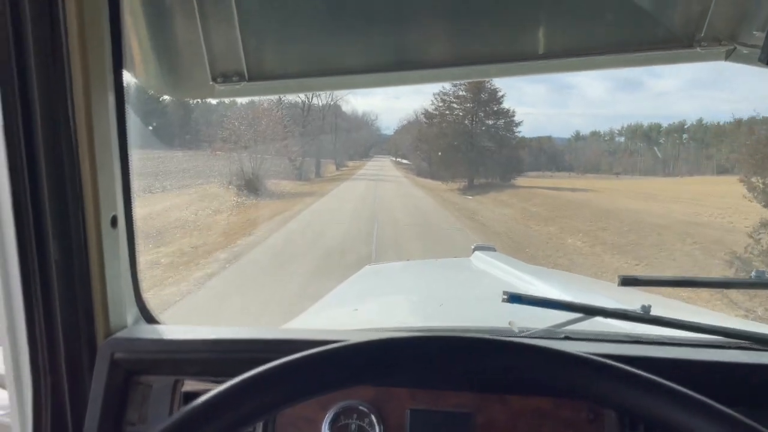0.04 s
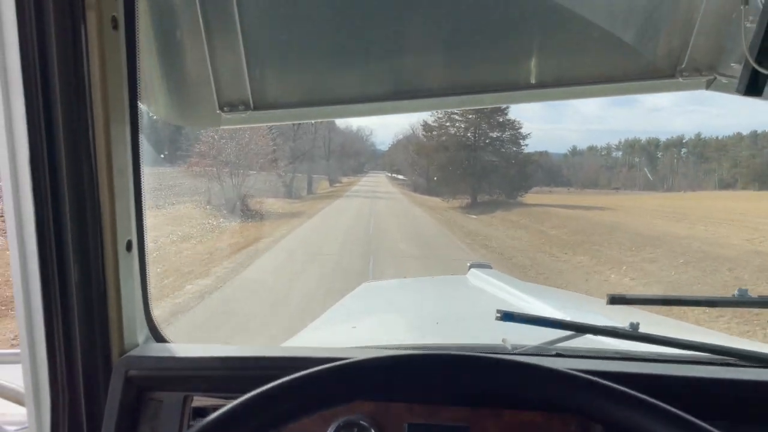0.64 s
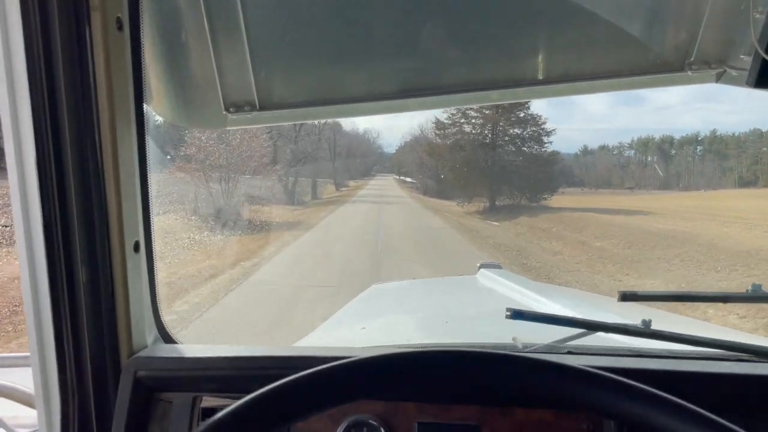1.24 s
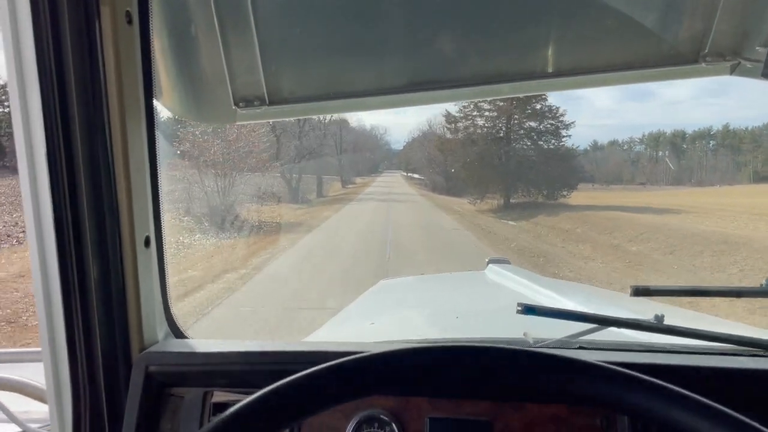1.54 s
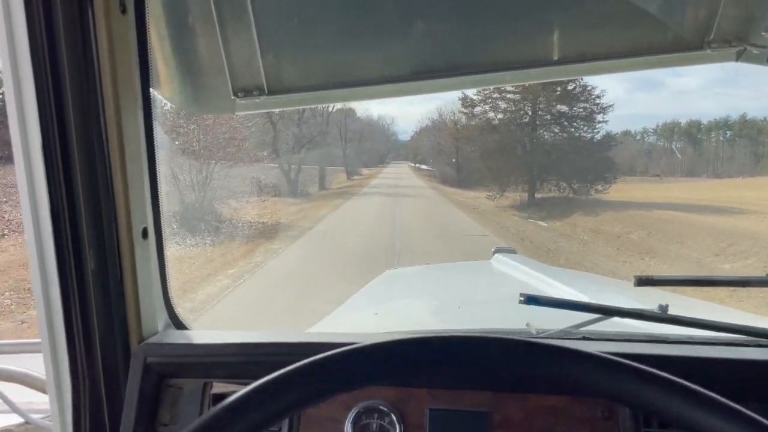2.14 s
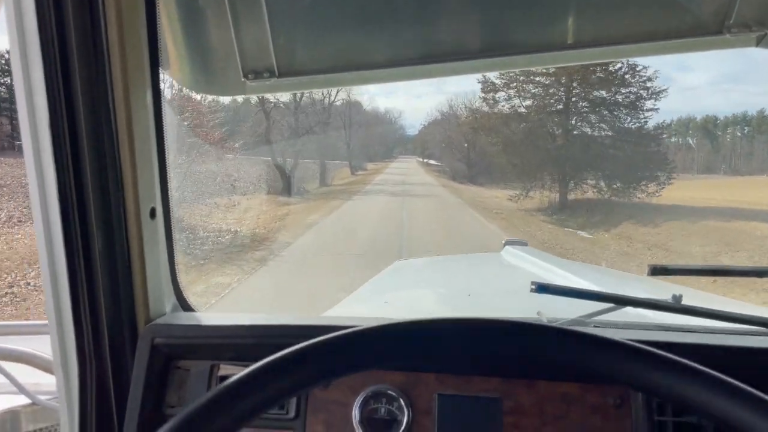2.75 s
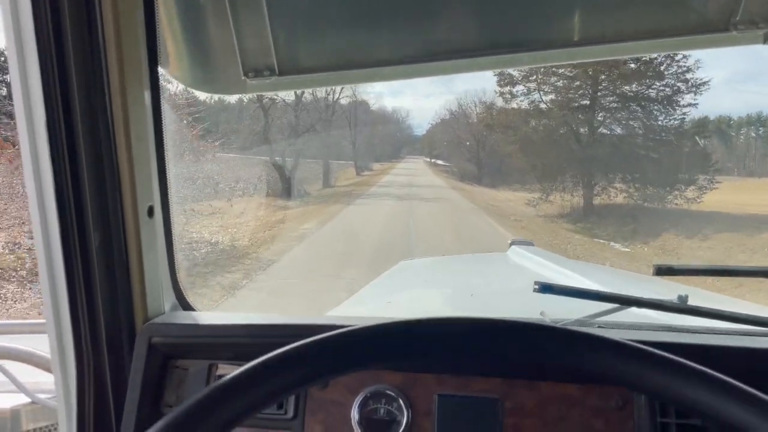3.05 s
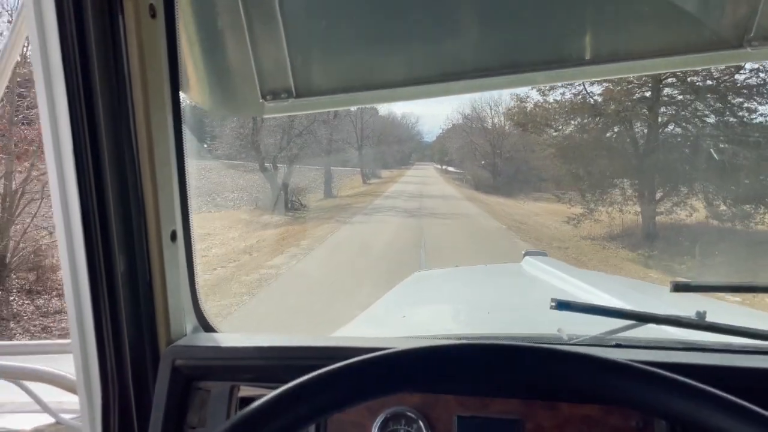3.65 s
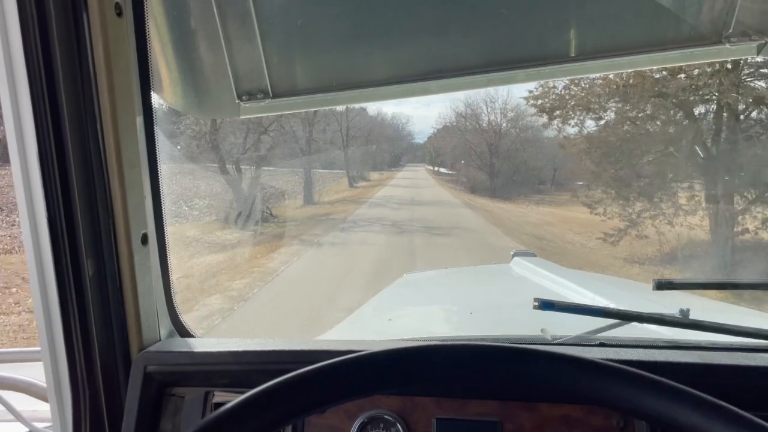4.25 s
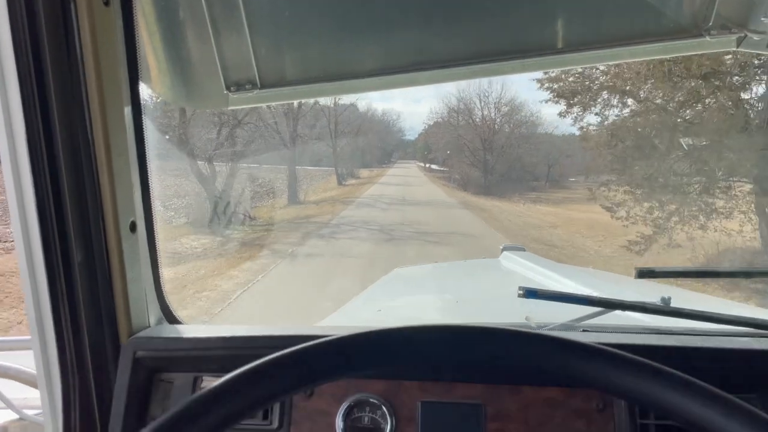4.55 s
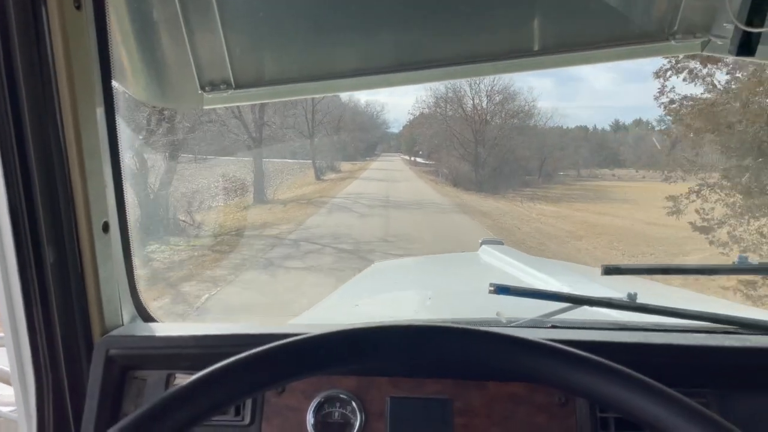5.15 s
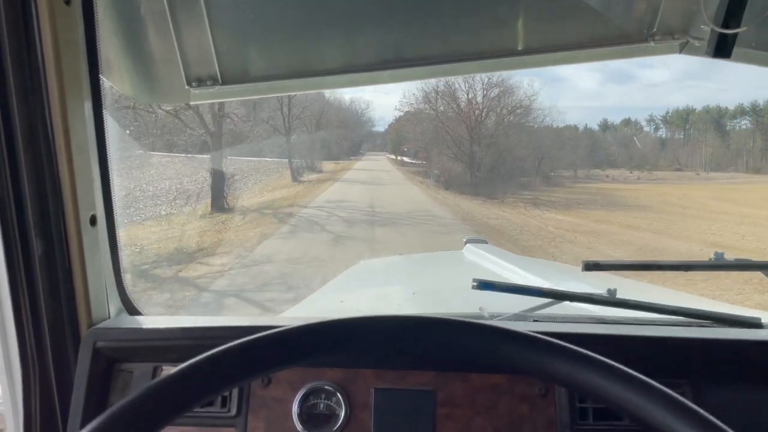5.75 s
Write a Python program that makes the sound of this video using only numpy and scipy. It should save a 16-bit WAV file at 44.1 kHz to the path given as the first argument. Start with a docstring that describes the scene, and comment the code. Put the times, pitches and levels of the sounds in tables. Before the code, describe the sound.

A heavy truck's diesel engine pulls hard, heard from the driver's seat over a low tyre rumble and faint whining gears. The turbo whistles and hisses upward in pitch, holds briefly, then winds down as the revs drop. The next gear goes in with a short clunk and a gruff burst from the engine, and the boom and whistle build again in the enclosed cab.

```python
"""A deep diesel boom and roar fill the cab of a semi truck on a country road. The six-cylinder engine
pulls up to about 1500 rpm, eases off for a gear change and pulls again. Exhaust pulses make the boom,
and burning fuel roars through the wall behind the engine. The turbo, a fast air pump, whistles and
hisses as it speeds up, runs down and speeds up again. Underneath, tyres rumble, gears whine and
the shafts to the wheels knock as the next gear goes in."""
import sys
import numpy as np
from scipy import signal
from scipy.fft import rfft, irfft, next_fast_len
from scipy.io import wavfile
from scipy.ndimage import uniform_filter1d, minimum_filter1d

SR = 44100
rng = np.random.default_rng(int(sys.argv[2]) if len(sys.argv) > 2 else 0)


def store_wav(level_fs):
    """Save 16-bit WAV to argv[1]."""
    pcm = np.round(np.clip(np.atleast_2d(level_fs), -1, 1) * 32767)
    wavfile.write(sys.argv[1], SR, pcm.T.astype(np.int16))


N = 264159
TIME = np.arange(N) / SR

# how the two ears compare: (frequency [Hz], likeness [0-1], left ear's lead [radians])
EAR_MATCH = [(50, .96, 0), (160, .92, 0), (230, .55, .4), (430, .5, 1.1), (550, .65, 2.3), (900, .7, 2.3),
             (1100, .55, 3.2), (1450, .65, 3.3), (2400, .3, 4.3), (3700, .3, 8.4), (4900, .5, 7.8),
             (6500, .45, 7.6), (8000, .25, 4.5), (9400, .5, 3), (10600, .97, 0), (15000, .99, 0)]


def from_db(db):
    """Turn decibels into a number to multiply by."""
    return 10 ** (np.asarray(db) / 20)


def rms_one(x):
    """Scale a signal so that its average strength (rms) is 1."""
    return x / np.sqrt(np.mean(x ** 2) + 1e-20)


def in_time(rows):
    """Join a table's points in time with straight lines, giving one curve per value column."""
    times, *columns = np.transpose(rows)
    return [np.interp(TIME, times, column) for column in columns]


def at_hz(spectrum, hz):
    """Read levels from rows of (frequency [Hz], level [dB]), with octaves evenly spaced."""
    known_hz, db = np.transpose(spectrum)
    return np.interp(np.log(hz), np.log(known_hz), db)


def bell(x, centre, width):
    """A smooth hump of height 1; the width is taken halfway up."""
    return .5 ** ((2 * (x - centre) / width) ** 2)


def phase_of(hz):
    """The angle, in radians, that a changing frequency has turned through."""
    return 2 * np.pi * np.cumsum(hz) / SR


def any_phase():
    """A random starting angle."""
    return rng.uniform(0, 2 * np.pi)


def drift(rate_hz):
    """A smooth random wobble of size about 1, made by dulling coarse noise."""
    step, warm_up = 40, 2000
    pole = np.exp(-2 * np.pi * step * rate_hz / SR)
    noise = rng.standard_normal(N // step + warm_up + 2)
    slow = signal.lfilter([1], [1, -2 * pole, pole * pole], noise)[warm_up:]
    return np.interp(np.arange(N) / step, np.arange(len(slow)), rms_one(slow))


def tone(phase, waver, rate_hz):
    """A pure tone whose strength and timing waver at random."""
    strength = 1 + waver * drift(rate_hz)
    slip = waver * drift(rate_hz)
    return np.sqrt(2) * (strength * np.sin(phase) + slip * np.cos(phase))


def blurred_tone(phase, width_hz):
    """A narrow band of stereo noise that follows a tone's pitch."""
    pole = np.exp(-np.pi * width_hz / SR)
    blur = signal.lfilter([1 - pole], [1, -pole], rng.standard_normal((2, 2, N)))
    blur = signal.sosfilt(signal.butter(2, 2 * width_hz, fs=SR, output="sos"), blur)
    return rms_one(blur[0] * np.cos(phase) + blur[1] * np.sin(phase))


def cab_colour_db(hz):
    """The cab's panels and air ring at some pitches and swallow others."""
    # peaks and dips: (frequency [Hz], width [Hz], boost [dB])
    resonances = [(288, 19, -4), (347, 29, 1), (540, 40, 3.5), (606, 110, -1), (675, 11, 5.5), (810, 18, 3),
                  (889, 18, 5), (1018, 39, 5), (1112, 25, 4.5), (1317, 29, 3.5), (1456, 22, 5.5),
                  (1470, 54, -2), (1800, 93, 3.5), (2010, 100, 1.5), (3633, 34, 7.5), (3850, 45, -1.5),
                  (3860, 64, 7), (4470, 59, 6), (5110, 42, 7.5), (5970, 100, 5), (6540, 90, 7)]
    return sum(db / (1 + (2 * (hz - centre) / width) ** 2) for centre, width, db in resonances)


def in_cab(pair, spectrum):
    """Blend two unrelated signals into one stereo sound, shaped by a spectrum and by the cab."""
    # which ear hears each pitch louder: deepest bass on the right, most higher sound on the left:
    # (frequency [Hz], left minus right [dB])
    ear_balance = [(60, -18), (99, 16.5), (160, 3.5), (270, -2.5), (450, 1.5), (740, 6.5), (1220, 3.0),
                   (2010, 4.0), (3330, 4), (5500, 8.5), (9080, 0), (10600, 0), (15000, 0)]
    size = next_fast_len(N)
    common, contrast = rfft(pair, size)
    hz = np.maximum(np.arange(len(common)) * SR / size, 1)
    ear_hz, likeness, lead = np.transpose(EAR_MATCH)
    alike = np.interp(hz, ear_hz, likeness)
    sides = np.array([[1], [-1]])  # left, right
    stereo = np.sqrt((1 + alike) / 2) * common + np.sqrt((1 - alike) / 2) * contrast * sides
    stereo *= np.exp(.5j * sides * np.interp(hz, ear_hz, lead))  # the left ear hears it first
    gain_db = at_hz(spectrum, hz) + cab_colour_db(hz) + sides * at_hz(ear_balance, hz) / 2
    return irfft(stereo * from_db(gain_db), size)[:, :N]


def cab_noise(spectrum):
    """Stereo noise of strength 1 with a given spectrum, as heard in the cab."""
    return rms_one(in_cab(rng.standard_normal((2, N)), spectrum))


def cab_echoes(x, fade_s=.042):
    """Quick echoes from glass and panels clash with a gliding tone and make it flutter."""
    t = TIME[:SR // 6]
    tail = rng.standard_normal((2, len(t))) * from_db(-60 * t / fade_s) * (t > .002)
    tail /= np.sqrt(np.sum(tail ** 2, axis=1, keepdims=True))
    return signal.fftconvolve(x, tail, axes=1)[:, :N]


def engine_rpm(swing_hz=3.6, decay_s=.36):
    """Engine speed; it swings briefly each time the clutch grips and twists the shafts."""
    # pull, gear change, pull again: (time [s], speed [rpm])
    speeds = [(0.0, 1034), (0.6, 1090), (1.0, 1160), (1.6, 1266), (2.2, 1384), (2.8, 1481), (3.0, 1492),
              (3.2, 1425), (3.4, 1296), (3.6, 1217), (3.8, 1097), (4.0, 1080), (4.6, 1109), (5.2, 1152),
              (5.99, 1239)]
    # the clutch grips: (time [s], swing [rpm])
    clutch_grips = [(-0.04, 85), (4.04, 65)]
    rpm, = in_time(speeds)
    for start, swing in clutch_grips:
        since = np.maximum(TIME - start, 0)
        rpm += swing * np.exp(-since / decay_s) * np.sin(2 * np.pi * swing_hz * since)
    return rpm


def speed_octaves(cruise_rpm=1400):
    """Engine speed in octaves (doublings) above cruising speed."""
    return np.log2(engine_rpm() / cruise_rpm)


def tyres():
    """Tyres rolling on the road make a steady low noise."""
    # (frequency [Hz], level [dB])
    spectrum = [(20, 8), (150, 19.5), (400, -8), (480, -14), (700, -8.5), (2000, -14), (4200, -1.5),
                (7000, -16.5), (8300, -1.5), (15000, -57)]
    return from_db(-36.5) * cab_noise(spectrum)


def gearbox():
    """Gear teeth sing while they press on each other."""
    # one list each for first pull, gear change and second pull: (time [s], pitch [Hz], level [dB])
    whines = [
        [(.9, 1005, -67), (1.25, 1045, -35.5), (1.6, 1106, -38.5), (1.95, 1154, -35.5), (2.2, 1195, -36),
         (2.5, 1200, -64)],
        [(3.44, 987, -64), (3.51, 1000, -50), (3.58, 985, -50), (3.66, 990, -62)],
        [(4.8, 790, -65), (5.2, 806, -40), (5.7, 800, -40), (5.99, 797, -37)],
    ]
    sound = np.zeros((2, N))
    for rows in whines:
        hz, db = in_time(rows)
        engaged = (TIME >= rows[0][0]) & (TIME <= rows[-1][0])
        whine = np.array([tone(phase_of(hz) + any_phase(), waver=.76, rate_hz=13) for ear in range(2)])
        sound += engaged * from_db(db) * whine
    return sound


def driveline_knocks():
    """Slack in the shafts snaps shut as the next gear goes in, and the cab floor rings."""
    # knocks: (time [s], level [dB])
    knocks = [(3.716, -22), (3.759, -18), (3.78, -17)]
    # the floor's notes: (pitch [Hz], level [dB], time to fade by 60 dB [s])
    floor_notes = [(117, 6.5, 0.31), (165, -19, .09), (245, -4.5, 0.053), (340, -12, 0.064),
                   (440, -24, .05)]
    clicks = np.zeros(N)
    for start, db in knocks:
        clicks[int(start * SR)] = from_db(db)
    t = TIME[:SR // 3]
    ring = sum(from_db(db - 60 * t / fade) * np.sin(2 * np.pi * hz * t) for hz, db, fade in floor_notes)
    return signal.fftconvolve(clicks, ring)[:N]


def judder():
    """The cab shakes in short, low swells as the first pull takes hold."""
    # shakes: (time [s], length [s], level [dB])
    shakes = [(.16, 0.067, -25), (0.294, 0.092, -27), (0.452, 0.11, -25), (0.604, 0.054, -28)]
    # their noise: (frequency [Hz], level [dB])
    spectrum = [(90, -30), (180, -3), (225, 9), (300, -25), (520, -4.5), (900, -34), (4000, -100)]
    return sum(from_db(db) * bell(TIME, when, length) for when, length, db in shakes) * cab_noise(spectrum)


def flares_db():
    """The whistle briefly swells or sinks at each ear, mostly where its glide turns."""
    # (time [s], length [s], left boost [dB], right boost [dB])
    flares = [(.29, .06, 7, 5), (.75, .06, 8, 5), (1.255, .05, 3, 3), (2.59, .07, -2, 9.5),
              (2.797, 0.085, 9, 12), (3.17, .08, -13, -10), (3.69, .06, 3, 2), (3.915, .05, 17, 9),
              (4.105, .08, 15, 4), (4.18, .04, -8, 3), (4.322, .05, 16, 11), (5.955, .05, 6, 1)]
    return sum(np.outer(ears_db, bell(TIME, when, length)) for when, length, *ears_db in flares)


def whistle_level(hz, load_db, settle_hz_per_s=6700):
    """The whistle grows with speed and load, and swells or sinks as it passes standing waves."""
    # pitches where echoes add up or cancel: (pitch [Hz], width [Hz], left boost [dB], right boost [dB])
    standing_waves = [(3185, 120, 9, 4), (3700, 210, -6, -2), (3820, 60, 5, -9), (4345, 106, 7, 10),
                      (4650, 250, 7, 3.5), (4815, 120, 10, 9), (5030, 104, 10, 4), (5370, 150, 3.5, 10.5),
                      (5590, 190, 1, -8), (5850, 95, 5, 5), (6060, 210, 9, 11), (6422, 326, 13.5, 18.5)]
    left_db = -35.5 + 8 * np.log2(hz / hz.max()) + .55 * load_db
    right_db = left_db - 5.5  # farther from the turbo
    waves_db = sum(np.outer(ears_db, bell(hz, centre, width)) for centre, width, *ears_db in standing_waves)
    # a fast glide leaves the waves no time to build up
    settled = 1 / (1 + (np.gradient(hz) * SR / settle_hz_per_s) ** 4)
    return from_db(np.array([left_db, right_db]) + np.minimum(waves_db, settled * waves_db) + flares_db())


def whistle(phase, hz, level):
    """The turbo's blades sing; churning air and echoes roughen the tone except near top speed."""
    ear_hz, _, lead = np.transpose(EAR_MATCH)
    ear_phases = (phase + np.interp(hz, ear_hz, lead), phase)
    clear = np.array([tone(angle, waver=.36, rate_hz=36) for angle in ear_phases])
    gliding = 1 - (hz / hz.max()) ** 24
    breath_share = .3 * gliding
    breath = np.sqrt(breath_share) * blurred_tone(phase, width_hz=29)
    direct = from_db(2) * level * (np.sqrt(1 - breath_share) * clear + breath)
    return direct + from_db(-4.5) * cab_echoes(gliding * direct)


def through_duct(x):
    """The air intake pipe passes some pitches better than others; then the cab colours them."""
    # what the pipe lets out: (frequency [Hz], boost [dB])
    duct = [(3000, 3), (4500, 5), (5200, 7), (5600, 1), (5930, 0), (6600, -8), (7400, 5.5), (9400, -9),
            (10300, -5), (10850, 6), (11600, 1.5), (12000, -7), (12450, 1.5), (13000, 1.5), (15000, -12)]
    size = next_fast_len(N)
    hz = np.maximum(np.arange(size // 2 + 1) * SR / size, 1)
    return irfft(rfft(x, size) * from_db(at_hz(duct, hz) + cab_colour_db(hz)), size)[..., :N]


def churning_air(phase, level):
    """Rough air rushes around the whistle's pitch; a swirl slower than the blades sounds just below."""
    smooth_level = uniform_filter1d(level, int(.2 * SR))
    rush = from_db(-9) * blurred_tone(phase, width_hz=194)
    surge_db = 11 * bell(TIME, centre=3.855, width=.075)  # the turbo's pressure collapses
    swirl = from_db(-4.5 + surge_db) * blurred_tone(.97 * phase, width_hz=140)
    return smooth_level * (rush + swirl)


def whistle_octave(phase, hz, load_db):
    """Blade speed and load steepen the sound wave, adding a piercing tone at twice the pitch."""
    steepness = (hz / hz.max()) ** 5 * from_db(.85 * load_db)
    octave = from_db(-43.5 + flares_db()[1]) * tone(2 * phase, waver=1, rate_hz=23)
    rush = from_db(-36) * blurred_tone(2 * phase, width_hz=430)[0]
    return steepness * (octave + rush)


def turbo(load_db, inertia_s=.1):
    """The spinning air pump whistles and hisses, louder with speed and load."""
    # the turbo's speed, heard as its whistle: (time [s], pitch [Hz])
    pitches = [(0.0, 2905), (0.15, 2935), (0.6, 3670), (1.2, 4735), (1.6, 5385), (2.0, 5972), (2.25, 6290),
               (2.52, 6474), (2.85, 6500), (3.04, 6170), (3.2, 5480), (3.5, 4550), (3.88, 3760),
               (4.22, 3480), (4.45, 3700), (5.0, 4568), (5.99, 6095)]
    # hiss of the pumped air: (frequency [Hz], level [dB])
    hiss_spectrum = [(2500, 7), (4200, 2), (4700, 7.5), (5250, 2.5), (5650, -8), (5930, 6), (6600, 5.5),
                     (7000, 6.5), (7500, -8), (8100, 7.5), (9400, -0.5), (11300, 4.5), (13200, 0),
                     (14000, -2), (15000, -19)]
    hz = uniform_filter1d(in_time(pitches)[0], int(inertia_s * SR), mode="nearest")
    phase = phase_of(hz * (1 + .0008 * drift(rate_hz=30)))
    level = whistle_level(hz, load_db)
    blades = whistle(phase, hz, level)
    intake = through_duct(churning_air(phase, level) + whistle_octave(phase, hz, load_db))
    hiss_db = -24 + 15.5 * np.log2(hz / hz.max()) + .71 * load_db
    return blades + intake + from_db(hiss_db) * cab_noise(hiss_spectrum)


def growl(cycle, load_db):
    """Fuel injectors and timing gears hum; each tone swells as it crosses a pitch the cab rings at."""
    # tones: (pitch [times the cycle rate], level [dB])
    hums = [(20, -13.5), (21, -9), (24, -2.5), (30, -5.5), (36, -7.5), (42, -8), (45, -14), (48, -8),
            (54, -11.5), (66, -16), (78, -14), (84, -24), (138, -20), (180, -19), (210, -16)]
    pair = np.zeros((2, N))
    for multiple, db in hums:
        for channel in pair:
            channel += from_db(db) * tone(multiple * cycle + any_phase(), waver=.54, rate_hz=2.9)
    return from_db(-32 + 1.23 * load_db) * in_cab(pair, spectrum=[(200, 0), (2000, 0)])


def bark(cycle):
    """A gruff burst, chopped by the six cylinders, as the fuel comes back after the gear change."""
    # noise of the hard firings: (frequency [Hz], level [dB])
    spectrum = [(120, -7), (450, -11), (780, 10), (1000, 0), (1400, -19), (4000, -37), (12000, -80)]
    burst = from_db(-30) * bell(TIME, centre=3.958, width=.055)
    return burst * (1 + .5 * np.cos(6 * cycle)) * cab_noise(spectrum)


def block_ring(cycle, size=4096):
    """Every cycle shakes the engine's metal block the same way, making many closely spaced tones."""
    # (frequency [Hz], level [dB])
    spectrum = [(140, -2.5), (300, -3), (500, -1), (1200, -4), (2000, -9.5), (2700, -21), (6000, -52)]
    harmonics = np.exp(2j * np.pi * rng.random((2, size // 8)))
    shapes = irfft(np.pad(harmonics, ((0, 0), (1, 0))), size)
    pair = [np.interp(cycle / (2 * np.pi), np.arange(size) / size, shape, period=1) for shape in shapes]
    return rms_one(in_cab(np.array(pair), spectrum))


def rasp(cycle, cylinders=6, depth=.38, decay_s=.004, spread_db=4):
    """A loudness curve that jumps at each firing; no two cylinders or firings are quite alike."""
    firing, fraction = np.divmod(cylinders * cycle / (2 * np.pi), 1)
    firing = firing.astype(int)
    since = fraction * 2 * np.pi / (cylinders * np.gradient(cycle) * SR)
    per_cylinder = rng.standard_normal(cylinders)[firing % cylinders]
    per_firing = rng.standard_normal(firing[-1] + 1)[firing]
    uneven_db = spread_db * (per_cylinder + per_firing) / np.sqrt(2)
    return rms_one(1 + depth * from_db(uneven_db) * np.exp(-since / decay_s))


def combustion(cycle, load_db):
    """Burning fuel shakes the cab, roars and rings the engine block, all louder under load."""
    # shaking of the cab: (frequency [Hz], level [dB])
    rumble_spectrum = [(15, -22), (32, -34), (50, 0.5), (75, -0.5), (115, 4), (160, 1.5), (225, -2.5),
                       (290, -4.5), (350, -8), (600, -71)]
    # roar through the wall: (frequency [Hz], level [dB])
    roar_spectrum = [(150, -7), (280, -1), (400, -2), (560, -1.5), (800, -3), (1050, -7), (1400, -5),
                     (1950, -9.5), (2700, -14.5), (3700, -17.5), (5400, -31), (6600, -27), (9000, -56),
                     (15000, -70)]
    rumble = from_db(-19.5 + .46 * load_db + 3 * speed_octaves()) * cab_noise(rumble_spectrum)
    roar = from_db(-22 + load_db) * cab_noise(roar_spectrum)
    block = from_db(-26.7 + load_db) * block_ring(cycle)
    return rumble + rasp(cycle) * (roar + block)


def exhaust(cycle, load_db):
    """Each firing sends out a pulse, built from low tones that boom where the cab rings with them."""
    # strongest tones, the firing rate first:
    # (pitch [times the cycle rate], level [dB], share of load followed [0-1], speed boost [dB/octave])
    main_tones = [(6, -13, 0.97, -1.5), (9, -14, 0.53, 3), (10, -19, 0.37, 16), (12, -14, 0.73, 1.5)]
    # weaker tones from unequal cylinders: (pitch [times the cycle rate], level [dB])
    weak_tones = [(4, -36), (5, -29), (11, -25.5), (13, -29.5), (14, -27), (15, -34), (16, -31), (17, -40),
                  (18, -32.5)]
    # how the cab answers a low tone: (frequency [Hz], boost [dB])
    cab_bass = [(50, 0), (56.5, 0.5), (58.7, -4.5), (60.5, -9), (62.3, -3), (65, -12), (67, -13), (71, -15),
                (74, -3), (78, -15), (84, -6.5), (90, -8), (98, -4.5), (106, -2.5), (111, -6), (121, 0.5),
                (127, -4.5), (133, -8), (139, -4.5), (150, -8.5)]
    cycle_hz = np.gradient(cycle) * SR / (2 * np.pi)
    speed = speed_octaves()
    voices = []
    for multiple, db, load_share, speed_boost in main_tones:
        level_db = db + load_share * load_db + speed_boost * speed + at_hz(cab_bass, multiple * cycle_hz)
        voices.append((multiple * cycle, from_db(level_db)))
    firing_phase, firing_gain = voices[0]
    firing = firing_gain * tone(firing_phase, waver=.033, rate_hz=4.1)
    upper = sum(gain * tone(phase, waver=.15, rate_hz=.47) for phase, gain in voices[1:])
    weak = sum(from_db(db) * tone(multiple * cycle + any_phase(), waver=.26, rate_hz=3.2)
               for multiple, db in weak_tones)
    weak *= from_db(-1.5 + .54 * load_db + 3 * speed)
    return firing * from_db([[-.7], [.7]]) + (upper + weak) * from_db([[.4], [-.7]])  # left, right


def scene():
    """Road, engine, gears and turbo as heard from the driver's seat."""
    # load, or how hard the driver's foot works the engine: (time [s], level against a full pull [dB])
    pedal = [(0.0, -3.5), (0.6, -0.5), (1.25, 0), (2.48, 0), (2.62, -7), (3.1, -8.5), (3.35, -10),
             (3.63, -11.5), (3.77, -9), (3.88, -10), (3.95, -7), (4.2, -5.5), (4.55, -3.5), (5.1, -3),
             (5.5, -1.4), (5.99, -0.5)]
    load_db, = in_time(pedal)
    cycle = phase_of(engine_rpm() / 120)  # one cycle is two turns, in which each cylinder fires once
    road = tyres()
    engine = exhaust(cycle, load_db) + combustion(cycle, load_db) + growl(cycle, load_db) + bark(cycle)
    return road + engine + gearbox() + driveline_knocks() + judder() + turbo(load_db)


def record(dry, ceiling=.94, cutoff_hz=15700):
    """Ease the volume down around the tallest peaks and cut off the highest treble."""
    window = SR // 100
    safe_gain = np.minimum(1, ceiling / (np.abs(dry).max(0) + 1e-9))
    gain = uniform_filter1d(minimum_filter1d(safe_gain, window), window)
    return signal.sosfilt(signal.ellip(10, .1, 90, cutoff_hz, fs=SR, output="sos"), dry * gain)


dry = scene()
out = record(dry)
store_wav(out)
```